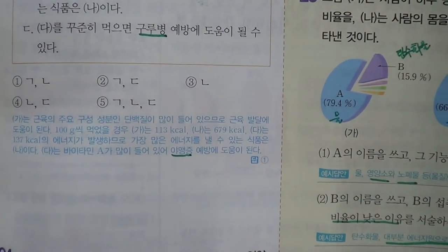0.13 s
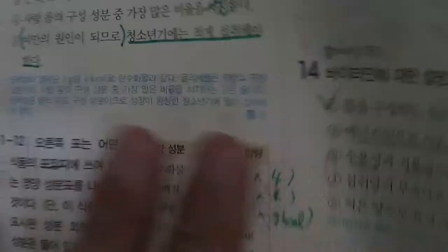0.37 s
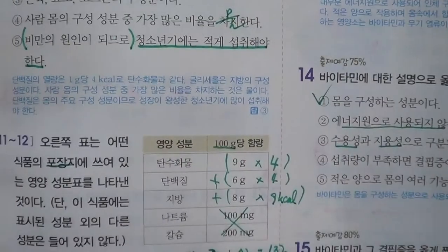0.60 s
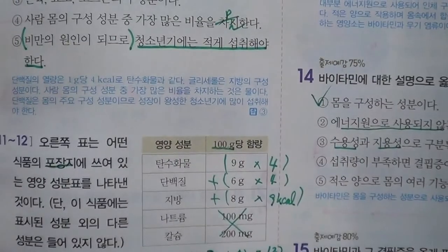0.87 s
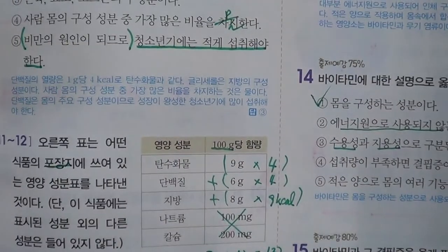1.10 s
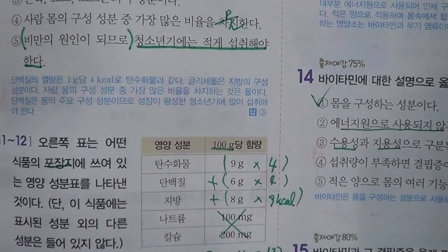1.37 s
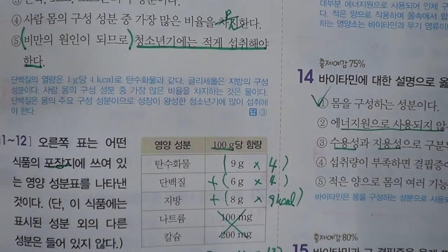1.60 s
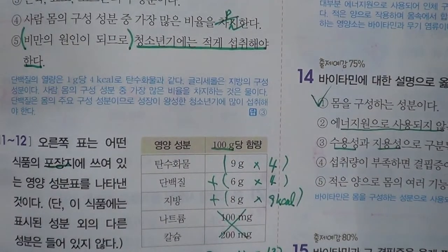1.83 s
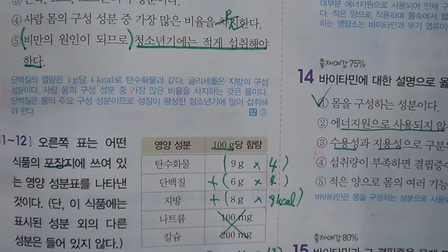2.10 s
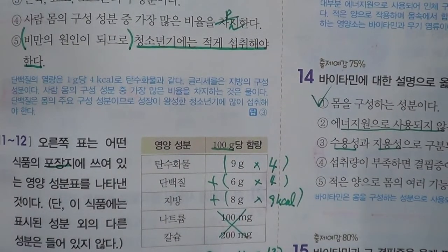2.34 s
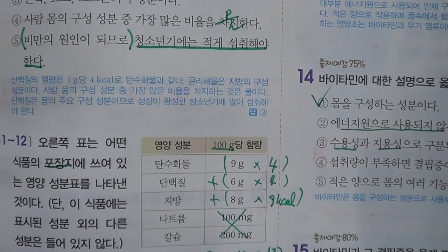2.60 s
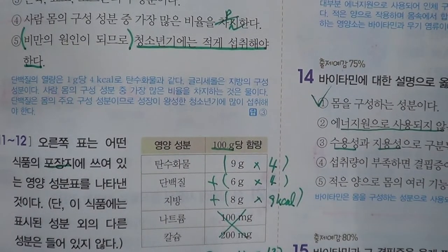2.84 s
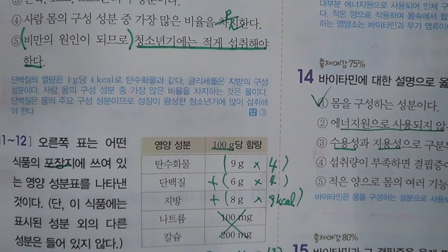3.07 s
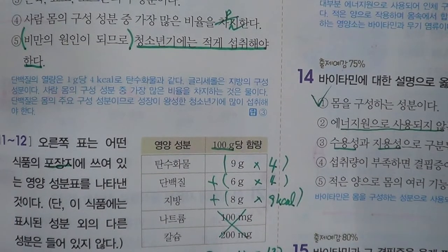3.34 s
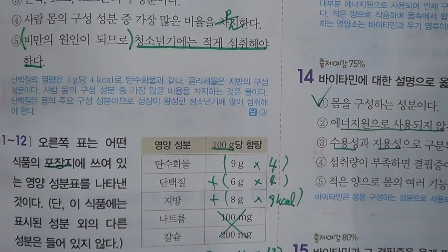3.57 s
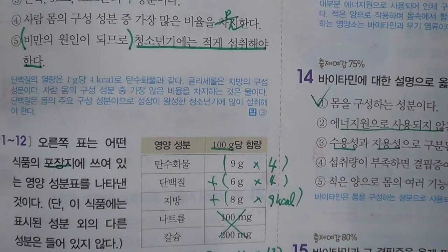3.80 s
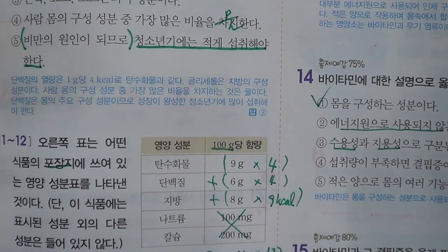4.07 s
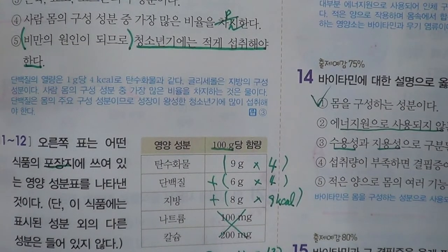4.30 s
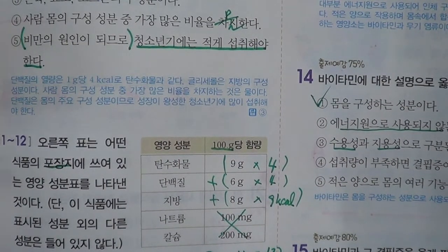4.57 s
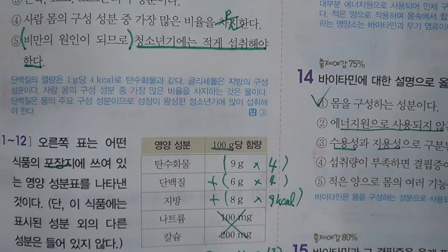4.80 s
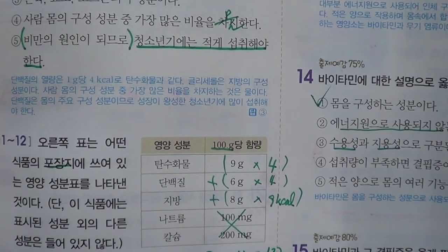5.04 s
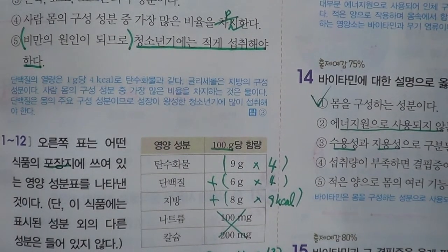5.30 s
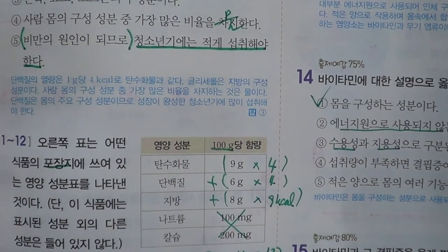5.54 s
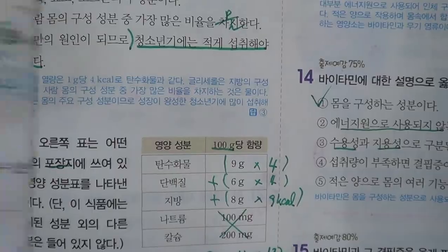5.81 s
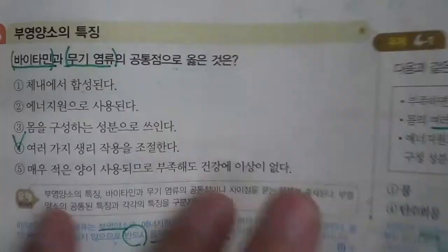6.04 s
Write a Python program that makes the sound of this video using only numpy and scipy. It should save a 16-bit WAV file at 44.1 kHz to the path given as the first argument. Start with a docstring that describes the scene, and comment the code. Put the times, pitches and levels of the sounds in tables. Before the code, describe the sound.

Two sharp, crackly page turns in a quiet humming room, separated by light finger rustles, thin hisses and small paper snaps close by.

```python
"""A short rub of fingers comes first, then a workbook page turns with a volley of creases snapping.
In a quiet room, the paper mostly left of the microphone, fingers fiddle with the next sheets; another page turns.
Rubbing is crackly dull noise and smooth bright noise, snaps are ringing bursts, flaps are low noise gusts.
Beneath: coloured noise, motor hum lines, a thin wavering whine and a camera's tick ringing in resonances."""
import sys
import numpy as np
from scipy import signal
from scipy.fft import rfft, irfft, next_fast_len
from scipy.io import wavfile

SR = 44100
rng = np.random.default_rng(int(sys.argv[2]) if len(sys.argv) > 2 else 0)


def gain_from_decibels(decibels):
    """Convert decibel values to linear amplitude factors."""
    exponent = np.asarray(decibels, float) / 20
    return 10 ** exponent


def wav_record(signal):
    """Record a signal, one row per channel, as 16-bit PCM in the file named by sys.argv[1]."""
    frames = np.transpose(np.atleast_2d(signal))
    bounded = np.clip(frames, -1, 1)
    # unit amplitude maps onto the largest positive 16-bit level
    quanta = np.round(bounded * 32767).astype(np.int16)
    wavfile.write(sys.argv[1], SR, quanta)


N = 271656   # length in samples


def rms_one(x):
    """Scales to rms 1."""
    return x / np.sqrt(np.mean(x ** 2) + 1e-20)


def at_hz(points, hz):
    """Reads a table on a log-frequency axis."""
    table_hz, values = np.transpose(points)
    return np.interp(np.log(hz), np.log(table_hz), values)


def drift(rate_hz):
    """Random wander of rms 1: noise through two equal low-pass poles, made at SR / 20."""
    r = np.exp(-40 * np.pi * rate_hz / SR)
    noise = rng.standard_normal(N // 20 + 2002)
    slow = signal.lfilter([1], [1, -2 * r, r * r], noise)[2000:]   # drop the filter's start
    return np.interp(np.arange(N) / 20, np.arange(len(slow)), rms_one(slow))


def resonance(x, hz, width_hz):
    """Two-pole resonance, gain 1 on top."""
    r = np.exp(-np.pi * width_hz / SR)
    zeros = (1 - r * r) / 2 * np.array([1, 0, -1])
    poles = [1, -2 * r * np.cos(2 * np.pi * hz / SR), r * r]
    return signal.lfilter(zeros, poles, x)


def coloured(source, spectrum, likeness, patchy_db, per_s):
    """Third-octave bands of mid and side noise, each with its own level, flicker and likeness; rms 1."""
    out = 0
    edges = 20 * 2 ** np.arange(0, 9.9, 1 / 3)
    for k, (low, high) in enumerate(zip(edges, edges[1:])):
        hz = np.sqrt(low * high)
        if spectrum[0][0] < hz < spectrum[-1][0]:
            band = signal.butter(2, [low, high], "band", fs=SR, output="sos")
            mid, side = signal.sosfilt(band, source[k % 2])   # neighbouring bands use different noise
            alike = np.clip(at_hz(likeness, hz), 0, 1)
            stereo = np.sqrt(1 + alike) * mid + np.sqrt(1 - alike) * side * [[1], [-1]]
            out = out + gain_from_decibels(at_hz(spectrum, hz) + patchy_db * drift(per_s)) * stereo
    return rms_one(out)


def fibres(grain_db, clump_db, clump_per_s):
    """Fibres catch and let go: noise of uneven grains that come in clumps."""
    grains_db = grain_db * np.minimum(rng.exponential(1, N), 6)
    sizes = gain_from_decibels(grains_db + clump_db * drift(clump_per_s))
    return sizes * rng.standard_normal((2, 2, N))


def swell(start, top, stop, rise_db, sag_db, stop_db_per_s):
    """Gain that swells to 1, sags until the stop, then dies for a second."""
    # a top or stop that comes too early is moved just later
    times = [start, max(top, start + 1e-3), max(stop, top + 2e-3), stop + 1]
    levels_db = [-rise_db, 0, -sag_db, -sag_db - stop_db_per_s]
    return gain_from_decibels(np.interp(np.arange(N) / SR, times, levels_db, left=-200))


# steady noise of the room: f/Hz, relative level per Hz/dB
FLOOR_SPECTRUM = [(18, -21.5), (60, -17.5), (170, -5), (300, -12.5), (640, -19), (1000, -26.5),
                  (4000, -28.5), (17000, -36)]
# how alike its left and right are: f/Hz, correlation
FLOOR_ALIKE = [(200, 0.97), (700, 0.35), (1600, .1), (15000, 0.81)]


def floor_noise():
    """Steady hiss and low rumble as noise whose bands flicker a little."""
    white = rng.standard_normal((2, 2, N))
    return gain_from_decibels(-62) * coloured(white, FLOOR_SPECTRUM, FLOOR_ALIKE, patchy_db=2.5, per_s=12)   # -62 dB rms


# motor lines: f/Hz, rms level before wavering/dB
HUM_LINES = [(58.5, -74), (112.5, -66.5), (120, -67.5), (220.4, -68), (229.6, -68.5)]


def hum():
    """Motor lines, the close pairs beating, each wavering a little in level."""
    t = np.arange(N) / SR
    out = 0
    for hz, db in HUM_LINES:
        gain = np.sqrt(2) * gain_from_decibels(db + 1.0 * drift(3.0))
        out = out + gain * np.sin(2 * np.pi * hz * t + rng.uniform(0, 2 * np.pi))
    return out


# resonances that ring with the tick: f/Hz, width/Hz, rms level/dB
TICK_RINGS = [(2430, 73, -76), (3397, 150, -73.5)]
TICK_PER_S, TICK_START_S = 30000 / 1001, .0105
TICK_WEAK_DB, TICK_NOISE_SHARE = -7, 0.5   # every second click; noise rms over click rms


def camera_tick():
    """Strong and weak clicks in turn, once a frame, ring in narrow resonances that noise keeps whining."""
    at = np.arange(TICK_START_S * SR, N - 1, SR / TICK_PER_S).astype(int)
    clicks = np.zeros(N)
    clicks[at] = gain_from_decibels(TICK_WEAK_DB * (np.arange(len(at)) % 2))
    drive = rms_one(clicks) + TICK_NOISE_SHARE * rng.standard_normal(N)
    out = 0
    for hz, width_hz, db in TICK_RINGS:
        ring = resonance(resonance(drive, hz, width_hz), hz, 2 * width_hz)
        out = out + gain_from_decibels(db) * rms_one(ring)
    return out


WHINE_HZ, WHINE_WANDER_HZ = 9900, 110
WHINE_DB, WHINE_THROB = -77, .8   # sine amplitude before throbbing; depth of the throb


def whine():
    """A thin high tone that wavers in pitch and throbs at twice the tick's rate."""
    throb = 1 + WHINE_THROB * np.sin(4 * np.pi * TICK_PER_S * np.arange(N) / SR)
    hz = WHINE_HZ + WHINE_WANDER_HZ * drift(40)
    return gain_from_decibels(WHINE_DB) * throb * np.sin(2 * np.pi * np.cumsum(hz) / SR)


# air at the microphone: f/Hz, relative level per Hz/dB
AIR_SPECTRUM = [(18, -19), (100, -8), (300, -10.5), (900, -26)]
# how alike it is left and right: f/Hz, correlation
AIR_ALIKE = [(100, .85), (350, .2)]
# gusts off the turning sheet: start t/s, strongest t/s, stop t/s, level at strongest/dB
AIR_GUSTS = [(.2, 0.28, 0.35, -35), (0.29, 0.298, 0.42, -22.5), (5.64, 5.813, 6.01, -36),
             (5.932, 5.935, 6.04, -30)]
GUST_RISE_DB, GUST_SAG_DB, GUST_STOP_DB_PER_S = 20, 16.5, 299.5


def flap():
    """A swinging sheet pushes air: lumpy low noise in short gusts."""
    air = coloured(fibres(0., 3.0, 50), AIR_SPECTRUM, AIR_ALIKE, patchy_db=1.5, per_s=15)
    gain = 0
    for *times, db in AIR_GUSTS:
        gain = gain + gain_from_decibels(db) * swell(*times, GUST_RISE_DB, GUST_SAG_DB, GUST_STOP_DB_PER_S)
    return air * gain


LANDINGS_S, POCKET_S = (.39, 5.975), .07
POCKET_FROM_HZ, POCKET_TO_HZ = 2100, 1051


def pocket():
    """The air pocket under a landing sheet rings at a falling pitch as it closes: a sliding noise band."""
    out = 0
    band = drift(320)
    for s in LANDINGS_S:
        closed = (np.arange(N) / SR - s) / POCKET_S
        hz = POCKET_FROM_HZ * (POCKET_TO_HZ / POCKET_FROM_HZ) ** np.clip(closed, 0, 1)
        out = out + (closed > 0) * (closed < 1) * band * np.cos(2 * np.pi * np.cumsum(hz) / SR)
    return out


# fingers slide or slip on the sheets: start t/s, hardest t/s, stop t/s,
# dull rustle level at hardest/dB, bright hiss level at hardest/dB
FINGER_STROKES = [(0, -0.001, .16, -50.5, -52), (.93, 0.933, 1.066, -77.5, -57.5),
                  (1.157, 1.242, 1.24, -62, -53.5), (1.31, 1.316, 1.38, -57, -61),
                  (1.46, 1.567, 1.62, -56.5, -49), (1.925, 1.934, 2.06, -59, -75),
                  (2.376, 2.41, 2.485, -57.5, -49.5), (2.434, 2.441, 2.453, -54, -39),
                  (2.53, 2.554, 2.57, -53, -39), (2.57, 2.59, 2.605, -59, -49),
                  (2.651, 2.658, 2.668, -60, -42), (2.681, 2.686, 2.699, -53, -44.5),
                  (2.753, 2.76, 2.812, -55.5, -45.5), (2.905, 2.9, 2.993, -53.5, -48),
                  (3.602, 3.632, 3.7, -56, -86), (3.75, 3.855, 3.93, -73.5, -54.5),
                  (3.952, 4.177, 4.28, -56, -47), (4.208, 4.218, 4.437, -55, -45.5),
                  (4.515, 4.52, 4.585, -52, -47), (4.598, 4.609, 4.64, -53, -55),
                  (4.624, 4.639, 4.44, -63, -43), (4.767, 4.817, 5.2, -67, -57),
                  (4.848, 4.877, 4.905, -51, -44.5), (4.954, 4.979, 5.008, -55, -43),
                  (5.084, 5.09, 5.34, -58, -50), (5.326, 5.408, 5.48, -51, -59),
                  (5.504, 5.559, 5.62, -51.5, -51.5)]
STROKE_RISE_DB, STROKE_SAG_DB = 17.5, 7   # from start to hardest, from hardest to stop
# the sheet's dull rustle lingers, the hiss of the skin stops dead
STROKE_STOP_DB_PER_S = (398, 2500)
# two whole pages lifted, swung over and settling: t/s, dull rustle level/dB, bright hiss level/dB
PAGE_TURNS = [
    [(0.157, -55, -55.5), (0.213, -37.5, -41), (0.284, -42, -48), (0.293, -27, -30), (0.309, -36, -42),
     (0.318, -22, -24), (0.331, -40, -43), (0.364, -43, -42), (0.387, -14.5, -24), (0.397, -27, -36),
     (0.405, -20, -35), (0.433, -35, -45), (0.5, -41, -44), (0.64, -90, -58)],
    [(5.61, -46, -44), (5.692, -52, -57), (5.697, -44, -46), (5.736, -43, -47), (5.744, -38, -47),
     (5.856, -43, -39), (5.893, -42, -46), (5.901, -46, -64), (5.933, -47, -68), (5.938, -26, -28),
     (5.97, -33, -40), (6.018, -25.5, -41), (6.054, -47, -43), (6.159, -59, -48.5)],
]
# the hands never rest quite still: dull and bright level, and how far and fast they wander
FIDGET_DB, FIDGET_WANDER_DB, FIDGET_PER_S = (-75, -70), 3.0, 4.9


def handling():
    """Dull and bright rubbing levels in dB: powers of fidgeting, finger strokes and page turns add up."""
    wander = np.array([drift(FIDGET_PER_S), drift(FIDGET_PER_S)])
    power = gain_from_decibels(np.array(FIDGET_DB)[:, None] + FIDGET_WANDER_DB * wander) ** 2
    for start, top, stop, *levels_db in FINGER_STROKES:
        gains = [gain_from_decibels(db) * swell(start, top, stop, STROKE_RISE_DB, STROKE_SAG_DB, dying)
                 for db, dying in zip(levels_db, STROKE_STOP_DB_PER_S)]
        power = power + np.array(gains) ** 2
    for s, *columns in map(np.transpose, PAGE_TURNS):
        curves = [np.interp(np.arange(N) / SR, s, db, left=-120, right=-120) for db in columns]
        power = power + gain_from_decibels(np.array(curves)) ** 2
    return 10 * np.log10(power)


# dull rustle of the sheet: f/Hz, relative level per Hz/dB
RUSTLE_SPECTRUM = [(300, -13), (500, -8), (1200, -6), (2400, -6), (3500, -14), (7000, -25)]
# bright hiss of skin on paper: f/Hz, relative level per Hz/dB
HISS_SPECTRUM = [(1500, -1), (3000, -7.5), (5000, 0), (9500, -0.5), (12500, -6), (16500, -17)]
# how alike both are left and right: f/Hz, correlation
PAPER_ALIKE = [(400, 0.99), (1400, 0.56), (15000, 0.93)]
POCKET_SHARE = 1.06   # rms of the pocket's noise envelope over that of the rustle


def rubbing():
    """Slides and slips of the fingers drive a dull, crackly rustle and a bright, smoother hiss."""
    dull_db, bright_db = handling()
    rustle = coloured(fibres(3.47, 3.6, 90), RUSTLE_SPECTRUM, PAPER_ALIKE, patchy_db=2.0, per_s=39)
    hiss = coloured(fibres(2.2, 1.8, 60), HISS_SPECTRUM, PAPER_ALIKE, patchy_db=3, per_s=12)
    darker = rms_one(signal.sosfilt(signal.butter(2, 6500, fs=SR, output="sos"), hiss))
    # a whole sheet bending sounds darker than a fingertip
    whole_sheet = np.clip((dull_db + 34) / 10, 0, 1)
    bright = hiss + whole_sheet * (darker - hiss)
    return gain_from_decibels(dull_db) * (rustle + POCKET_SHARE * pocket()) + gain_from_decibels(bright_db) * bright


# creases buckling: t/s, peak level before panning/dB, buckle f/Hz, crack level over the ring/dB
CREASE_SNAPS = [(0.267, -13, 1980, -12), (0.301, -13, 500, 3), (0.315, -6.5, 1020, 4),
                (0.322, -12, 1500, 2), (0.372, -11, 700, -8), (1.438, -38.5, 1750, -8.5),
                (2.127, -34.5, 1500, 10), (2.344, -30, 2410, 10), (2.388, -23, 2430, 1.5),
                (2.411, -30, 1390, 12), (2.654, -26, 835, -2), (2.757, -24, 900, 4), (2.893, -29, 1600, -1),
                (2.905, -26, 2200, 4), (2.909, -15, 2180, -3), (3.21, -31.5, 2080, -10.5),
                (3.361, -21, 1760, 6.5), (4.099, -28, 1400, -8), (4.167, -19, 2470, 1),
                (4.19, -25.5, 1500, 9), (4.379, -31.5, 900, -6), (4.519, -25, 1000, -4),
                (4.572, -25, 1200, -5), (4.611, -32.5, 1890, 2.5), (4.938, -29.5, 1950, 2.5),
                (5.021, -31, 950, -2), (5.741, -19, 1500, -14), (5.801, -21, 510, -12),
                (5.874, -16, 1300, 3), (5.896, -27, 700, 0), (5.936, -15, 500, -3), (5.949, -5, 2240, -4),
                (5.958, -6.5, 1960, 7), (5.977, -4.5, 2400, -7)]


def peak_one(x):
    """Scales to peak 1."""
    return x / abs(x).max()


def snaps():
    """Each buckle is a burst dying in a few ms: a ring at its pitch, a crack above, the book's body between."""
    size = 1500   # samples
    out = np.zeros((2, N + size))
    t = np.arange(size) / SR
    body_band = signal.butter(2, [480, 2600], "band", fs=SR, output="sos")
    crack_band = signal.butter(3, [3000, 8500], "band", fs=SR, output="sos")
    for s, db, hz, crack_db in CREASE_SNAPS:
        burst = rng.standard_normal((2, size)) * (np.exp(-t / .0011) + .38 * np.exp(-t / .004))
        burst[:, 0] = 3.5   # the buckle begins with one clean step
        burst = burst[0] + 0.23 * burst[1] * [[1], [-1]]   # mid and a little side
        buckle = resonance(resonance(burst, hz, 0.7 * hz), hz, 2 * hz)
        body = signal.sosfilt(body_band, burst)
        crack = signal.sosfilt(crack_band, burst)
        sound = peak_one(buckle) + gain_from_decibels(crack_db) * peak_one(crack) + gain_from_decibels(-3) * peak_one(body)
        first = round(s * SR)
        out[:, first:first + size] += gain_from_decibels(db) * peak_one(sound)
    return out[:, :N]


ROOM_T60_S, ROOM_DB, WALL_CUT_HZ = 0.23, -19, 1670   # T60 of the lowest tones, gain, treble loss a round


def room(x):
    """Six feedback delays a side, duller on every round."""
    size = next_fast_len(N + SR // 2)
    hz = np.arange(size // 2 + 1) * SR / size
    sound = rfft(x, size)
    out = np.zeros((2, N))
    for k, lag in enumerate(rng.uniform(.006, .03, 12)):   # lag in s
        wall = gain_from_decibels(-60 * lag / ROOM_T60_S) / (1 + 1j * hz / WALL_CUT_HZ)
        loop = wall * np.exp(-2j * np.pi * hz * lag)
        out[k % 2] += irfft(sound * loop / (1 - loop), size)[:N] * (-1) ** (k // 2)
    return gain_from_decibels(ROOM_DB) * out


# the paper lies to the left, the first sheet swings across the middle: t/s, left over right level/dB
PAPER_PAN = [(.27, 4), (.46, -1), (.6, 3.5)]


def scene():
    """Paper mostly a little to the left, in its room, over the steady background."""
    paper = rubbing() + snaps()
    pan_db = np.interp(np.arange(N) / SR, *np.transpose(PAPER_PAN))
    panned = paper * gain_from_decibels(pan_db / 2 * np.array([[1], [-1]]))
    paper = panned + room(paper.mean(axis=0))
    return paper + flap() + floor_noise() + hum() + camera_tick() + whine()


def top_cut(x):
    """Nothing passes above the cut-off."""
    return signal.sosfilt(signal.butter(12, 16500, fs=SR, output="sos"), x)


def record(dry):
    """The loudest peaks are rounded, then the top is cut steeply at 16150 Hz."""
    rounded = .8 * np.tanh(dry / .8)
    cut = signal.sosfilt(signal.cheby2(16, 60, 16150, fs=SR, output="sos"), rounded)
    return top_cut(cut)


dry = scene()
out = record(dry)
wav_record(out)
```